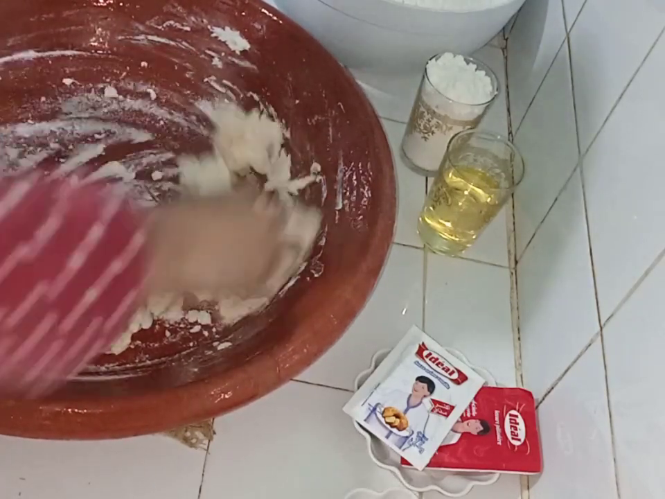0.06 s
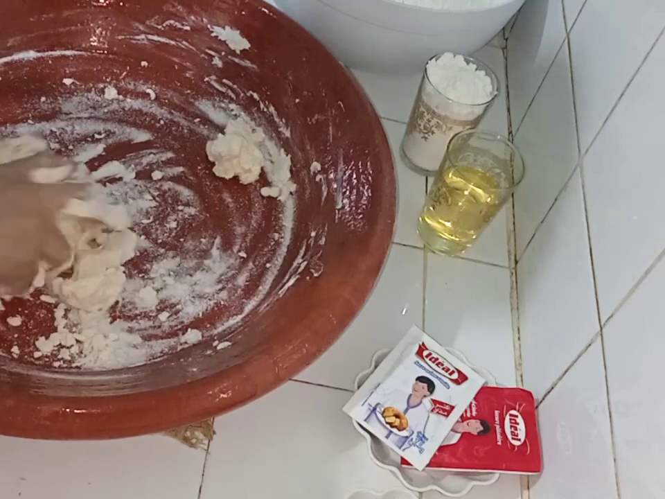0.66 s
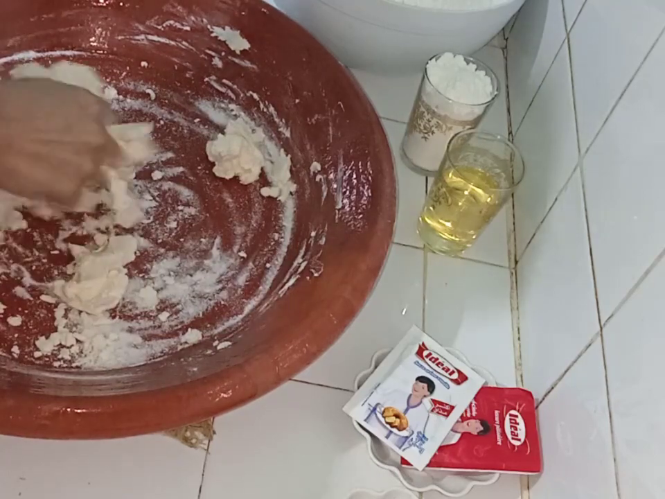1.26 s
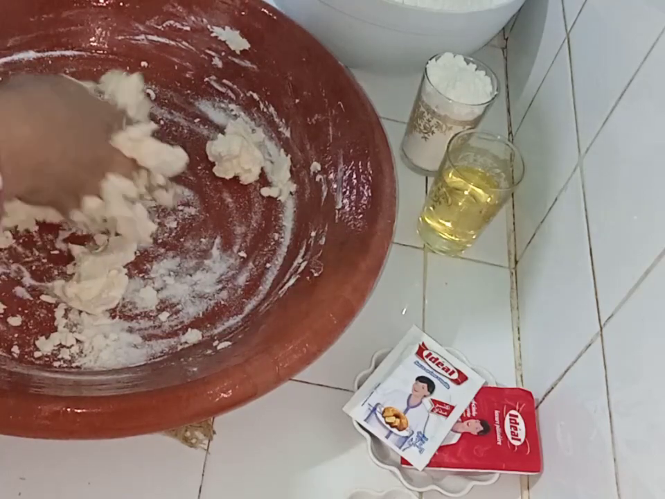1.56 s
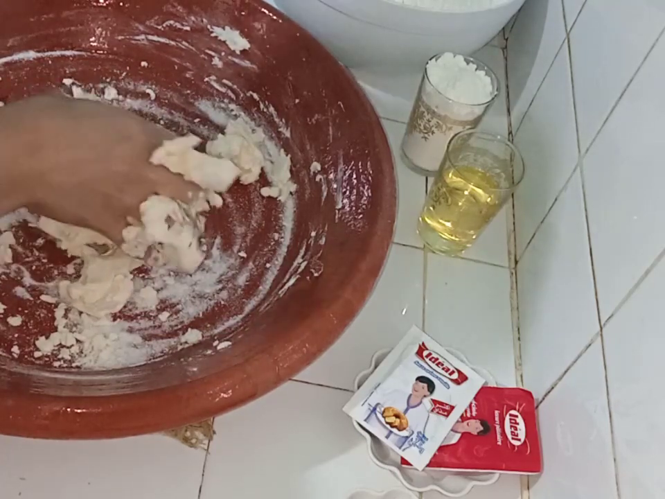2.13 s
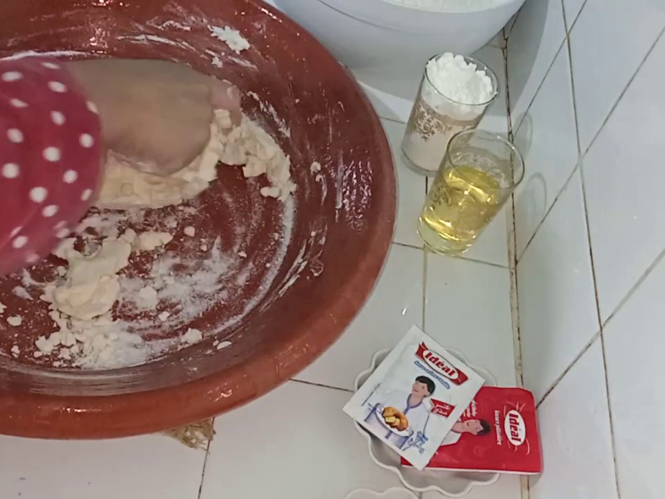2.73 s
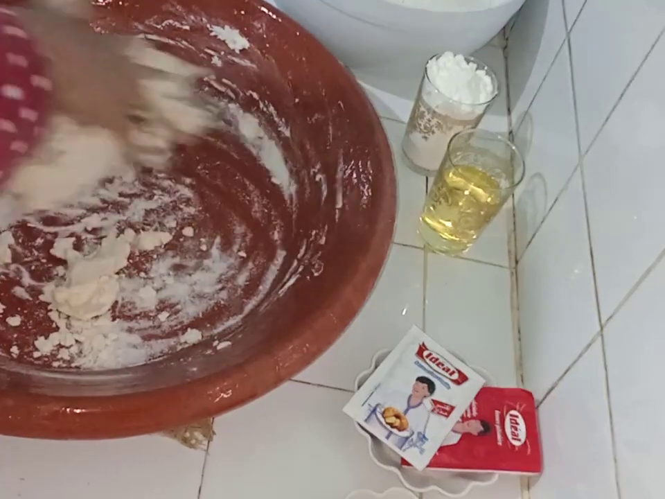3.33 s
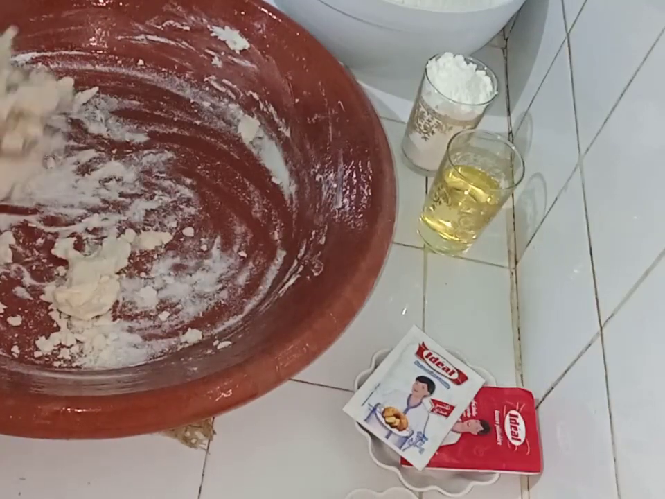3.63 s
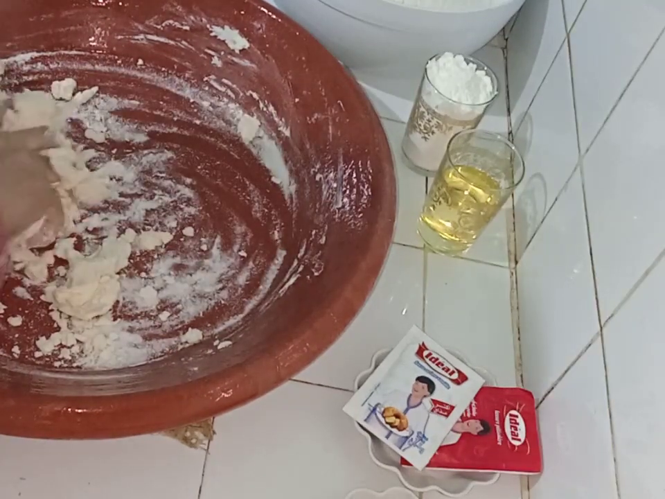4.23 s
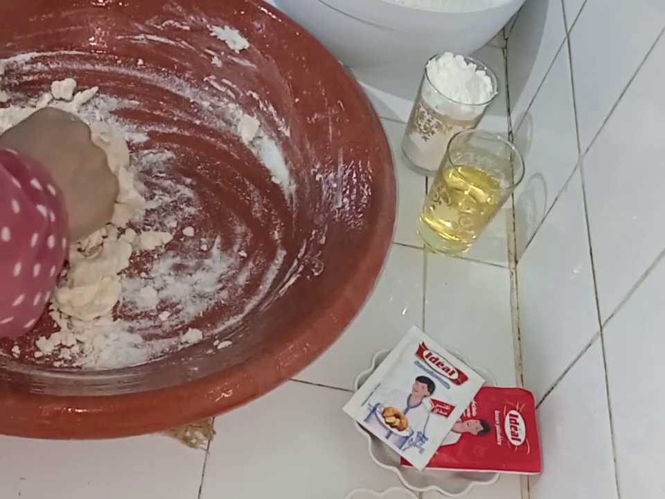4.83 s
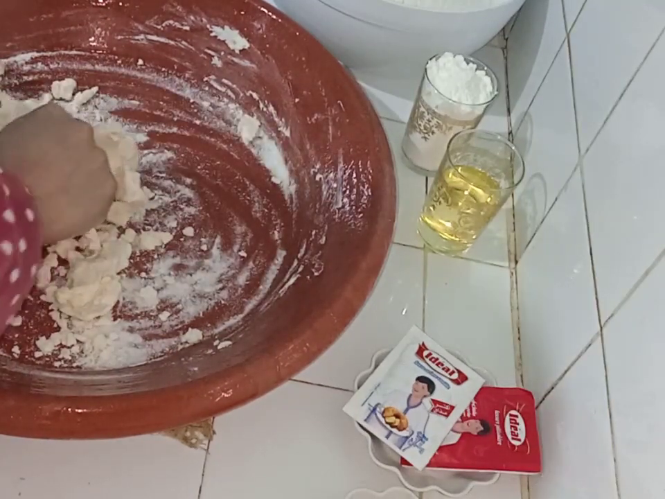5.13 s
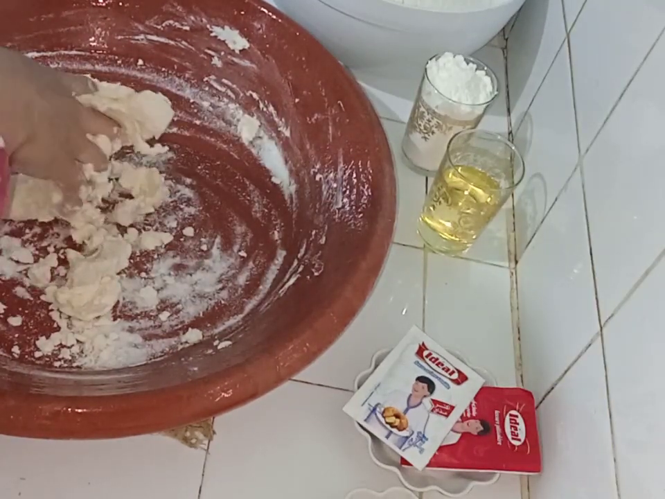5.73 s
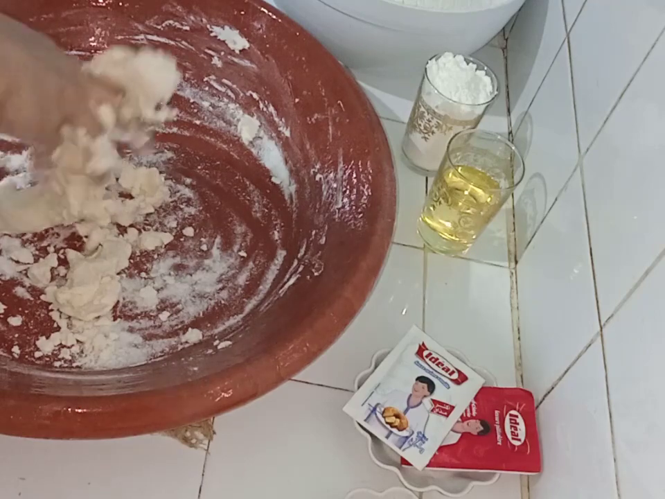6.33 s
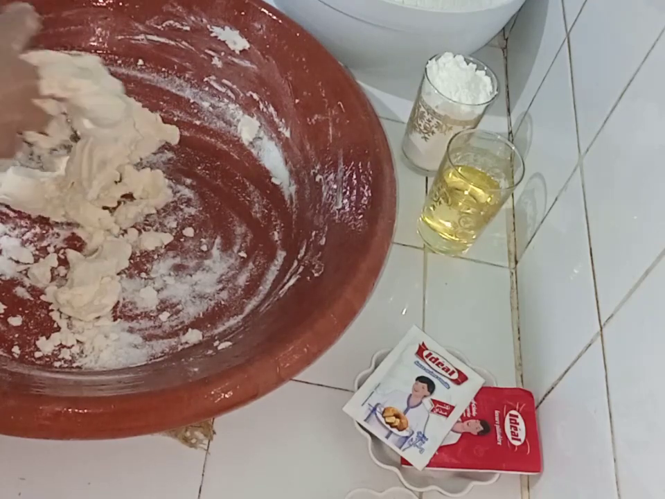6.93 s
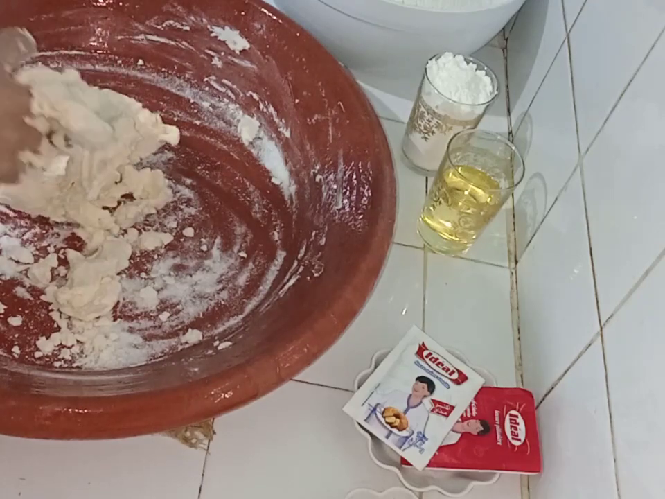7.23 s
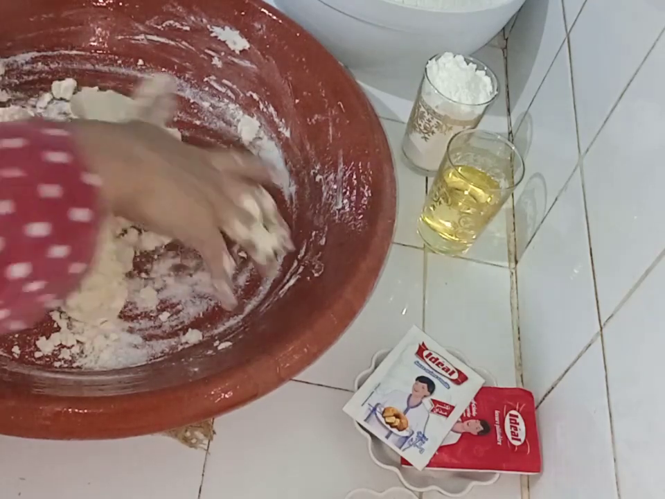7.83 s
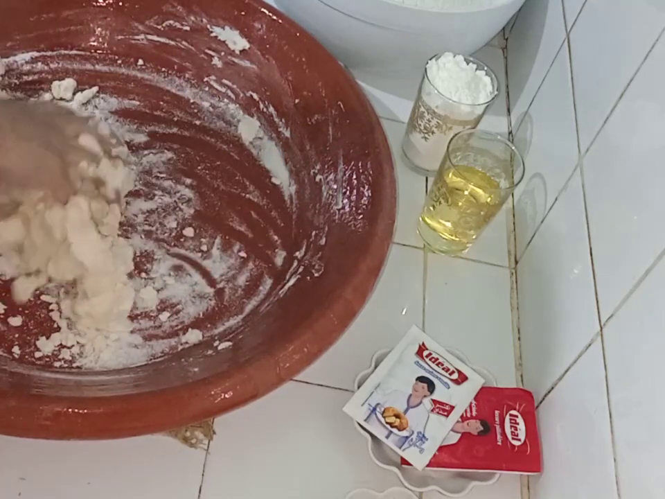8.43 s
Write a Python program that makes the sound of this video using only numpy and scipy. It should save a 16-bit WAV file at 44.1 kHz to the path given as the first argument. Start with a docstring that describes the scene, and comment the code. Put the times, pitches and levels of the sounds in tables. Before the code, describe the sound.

In a small tiled room, a parrot near the microphone repeats scratchy, high, hissing squawks. A quick opening run stops briefly, two more runs follow almost back to back, and a single squawk ends the scolding. Each note rings briefly off the tiles. Underneath are the very faint, sticky smearing of a hand working dough in a clay bowl and a low room hum.

```python
"""Runs of harsh, dry rasps, most likely a pet parrot scolding nearby in a small tiled room.
Each rasp is a source and a filter: a ragged train of pulses excites a throat whose resonances
slide up as the beak opens. Reflections off the tiles add a short, bright ring.
Far below, a hand kneads soft butter in a clay bowl, among faint hollow tones and a quiet room rumble."""
import sys
import numpy as np
from scipy import signal
from scipy.fft import rfft, irfft
from scipy.io import wavfile
from scipy.ndimage import uniform_filter1d

SR = 44100
rng = np.random.default_rng(int(sys.argv[2]) if len(sys.argv) > 2 else 0)


def persist_wave(psi):
    """Save psi, clipped to +-1, as 16-bit WAV."""
    counts = np.round(np.clip(psi, -1, 1) * 32767).astype(np.int16)
    wavfile.write(sys.argv[1], SR, np.atleast_2d(counts).T)


N = 373527
LEAD = SR // 4  # samples before time zero, so that the room already rings at the start

# spectrum of the quiet room: (frequency [Hz], level [dB])
ROOM_SPECTRUM = [(20, -37.5), (45, -17.5), (80, -9), (130, 3), (190, -3.5), (320, 4.5), (500, -4.5),
                 (800, -0.5), (1500, -10.5), (2700, -7), (4300, -22.5), (9000, -33.5), (16000, -36.5)]


def amp(db):
    """Decibels to amplitude ratio."""
    return 10 ** (np.asarray(db) / 20)


def unit(x):
    """Normalisation to rms 1."""
    return x / np.sqrt(np.mean(x ** 2) + 1e-20)


def read(points, hz):
    """Interpolation of a table on a log-frequency axis."""
    f, value = np.transpose(points)
    return np.interp(np.log(hz + 1), np.log(f + 1), value)


def colour(x, spectrum):
    """Spectral shaping: x filtered by a table of levels, at rms 1."""
    gain = amp(read(spectrum, np.fft.rfftfreq(len(x), 1 / SR)))
    return unit(irfft(rfft(x) * gain, len(x)))


def add(mix, start_s, sound):
    """Superposition of a sound on a track that begins LEAD samples early."""
    part = mix[max(LEAD + round(start_s * SR), 0):][:len(sound)]
    part += sound[:len(part)]


def wander(n, hz):
    """Random modulation of rms 1 that changes about hz times a second."""
    at = np.arange(n) * hz / SR
    return unit(np.interp(at, np.arange(n), rng.standard_normal(n)))


def patches(shape, bins, frames):
    """Random field of rms 1, correlated over bins in frequency and frames in time."""
    field = rng.standard_normal(shape)
    return unit(uniform_filter1d(uniform_filter1d(field, bins, 0), frames, 1))


def bell(hz, centre_hz, octaves):
    """Resonance curve: 1 at its centre, one half at the given octaves to either side."""
    return 1 / (1 + (np.log2((hz + 1) / centre_hz) / octaves) ** 2)


def room_air(air_db=-66.5, hum_hz=92.5, hum_db=-72.5, peak_s=4.2, fade_db_per_s=4):
    """Ambient noise, and a drone under random frequency and amplitude modulation that swells once."""
    air = colour(rng.standard_normal(N), ROOM_SPECTRUM) * amp(air_db)
    pitch_hz = hum_hz + 9 * wander(N, 30)
    hum = unit(np.sin(2 * np.pi * np.cumsum(pitch_hz) / SR))
    swell_db = hum_db - fade_db_per_s * abs(np.arange(N) / SR - peak_s)
    return air + hum * amp(swell_db + 3 * wander(N, 23))


def rumble(calls, level_db=-68, window_s=.35):
    """Envelope following: low noise swells with each run of rasps and drops out in the pauses."""
    envelope = np.sqrt(abs(uniform_filter1d(calls ** 2, int(window_s * SR))))
    return amp(level_db) * unit(envelope) * colour(rng.standard_normal(N), ROOM_SPECTRUM)


def kneading(ticks_per_s=250, tick_size=5, steady_db=-67.5, lumpy_db=2):
    """Friction noise: butter smears over clay in a lumpy hiss with sticky ticks; the level swells softly."""
    # spectrum of the smearing butter: (frequency [Hz], level [dB])
    smear_spectrum = [(150, -9), (330, -5), (550, -0.5), (900, 3), (1800, -3), (2900, -14), (4000, -23),
                      (8000, -33.5), (16000, -42)]
    # soft swells of low rustling noise, mostly under the runs of rasps:
    # (middle [s], length [s], level [dB])
    swells = [(.42, 0.19, -60), (1.202, .6, -64.5), (2.796, 0.42, -68.5), (4, 1.1, -65), (5.6, 0.51, -65),
              (6.55, 1.64, -61), (8.156, 0.41, -59)]
    ticks = (rng.random(N) < ticks_per_s / SR) * rng.standard_normal(N)
    smear = colour(rng.standard_normal(N) + tick_size * ticks, smear_spectrum)
    t = np.arange(N) / SR
    swelling = sum(amp(db) * np.exp(-(2 * (t - middle) / length) ** 2) for middle, length, db in swells)
    return smear * (amp(steady_db) + swelling) * amp(lumpy_db * wander(N, 25))


def hollow_tone(length, db, hz, width_hz):
    """Narrow resonance: random frequency modulation widens a softly swelling sine into a band."""
    n = int(length * SR)
    phase = 2 * np.pi * np.cumsum(hz + width_hz * wander(n, hz / 2)) / SR
    return amp(db) * unit(np.sin(phase) * np.hanning(n))


def tiled_room(x, direct_db=-6, early_db=-6.5, early_s=.009, bounces=7, tail_db=-4, modes_db=3):
    """Reverberation: direct sound, early reflections off near tiles, a diffuse tail and ringing modes."""
    # modes of the tiled corner: (frequency [Hz], level [dB])
    modes = [(1471, -4.5), (1602, -10.5), (1768, 3.5), (1890, -6.5), (2075, 2), (2266, 5), (2437, -14.5),
             (2767, -4.5), (2876, -9), (2966, -2.5), (3175, -4.5), (3795, 5), (4966, 1), (5993, 5)]
    # reverberation time of the room: (frequency [Hz], T60 [s])
    t60 = [(400, 0.41), (1500, 0.29), (3000, 0.26), (6000, 0.24), (9000, 0.26), (12000, 0.2), (16000, 0.17)]
    n = SR // 2
    t = np.arange(n) / SR
    echoes = rng.choice([-1., 1.], n) * (rng.random(n) < 3000 / SR) * (t > early_s / 2)
    hz, frame_s, spectra = signal.stft(echoes, SR, nperseg=256)
    fade_db = -60 * frame_s / read(t60, hz)[:, None]
    tail = signal.istft(spectra * amp(fade_db), SR)[1][:n]
    # the modes ring 0.44 times as long as the tail
    ring = sum(amp(db - 60 * t / (0.44 * read(t60, f))) * np.cos(2 * np.pi * f * t) for f, db in modes)
    response = amp(tail_db) * tail / np.linalg.norm(tail)
    response += amp(modes_db) * ring / abs(rfft(ring)).max()
    delays = (rng.uniform(.2, 1, bounces) * early_s * SR).astype(int)
    response[delays] += amp(early_db) * rng.choice([-1., 1.], bounces) / np.sqrt(bounces)
    response[0] += amp(direct_db)
    return signal.fftconvolve(x, response)


def ragged_pulses(n, pulse_hz=190, jitter=.36, puff_s=0.0018, leak=0.34, shimmer_db=0.7, snap=2.8):
    """Aperiodic source: membranes slap at uneven intervals, each slap a snap and a short puff of air."""
    turns = np.cumsum(pulse_hz * np.exp(jitter * wander(n, pulse_hz))) / SR
    cycle = turns.astype(int)
    size = amp(shimmer_db * rng.standard_normal(n))[cycle]
    puffs = (leak + np.exp(-(turns % 1) / (pulse_hz * puff_s))) * rng.choice([-1., 1.], n)
    snaps = np.diff(cycle, prepend=0)
    return size * (puffs + snap * snaps)


def beak(t, attack, low_hz, high_hz, tilt, shut_octaves=.85, shut_low_hz=1790):
    """Formant glide as the beak opens: gives closure [octaves] and the low and high resonance [Hz]."""
    usual_attack_s, usual_high_hz = 0.029, 6340
    # slow, dull rasps start more shut; wide or slow openings take longer
    glide = np.clip(0.76 + 17 * (attack - usual_attack_s) - 0.14 * tilt, 0, shut_octaves)
    opening_s = 0.022 * (high_hz / usual_high_hz) ** 6.3 * (attack / usual_attack_s) ** .6
    closure = glide * np.exp(-(t / opening_s) ** 2)
    low = low_hz * (shut_low_hz / low_hz) ** (closure / shut_octaves)
    return closure, low, high_hz / 2 ** closure


def throat(hz, t, db, attack, low_hz, high_hz, tilt, usual_db=-18.5, usual_low_hz=2600):
    """Formant filter: gain [dB] over frequency and time; the treble comes out as the beak opens."""
    # colour that all rasps share: (frequency [Hz], level [dB])
    voice_spectrum = [(350, -66.5), (680, -42.5), (830, -22), (1100, -22), (1400, -10), (1750, -3),
                      (2300, -3.5), (3000, -3.5), (3500, -5), (3900, 3), (4400, -10), (5100, -4),
                      (6300, -7), (8000, -12.5), (10000, -28), (12000, -29), (16000, -25.5)]
    closure, low, high = beak(t, attack, low_hz, high_hz, tilt)
    # a brighter rasp is more pinched: more low resonance, less middle and hiss
    low_db = 8 + 1.3 * tilt + 6.5 * np.log2(low_hz / usual_low_hz)
    middle_db = -6 - 1.9 * tilt
    hiss_db = 0.35 - 1.3 * tilt
    high_db = 8 + 1.15 * (db - usual_db)  # grows with loudness
    # like a pipe, the throat repeats its high resonance further up, more weakly
    high_series = sum(share * bell(hz, ratio * high, octaves=0.078)
                      for ratio, share in [(1, 1), (1.5, 0.42), (2, 0.42)])
    hiss_band = bell(hz, 13500, octaves=0.63)
    slope_db = (tilt - 3 * closure) * np.log2(np.maximum(hz / 3000, .2))
    gain_db = (read(voice_spectrum, hz) + slope_db
               + low_db * bell(hz, low, octaves=0.12)
               + middle_db * bell(hz, 3967, octaves=0.12)
               + high_db * high_series
               + hiss_db * hiss_band)
    squeals_db = 2.3 * patches(gain_db.shape, bins=2, frames=24)
    sputter_db = 3.5 * hiss_band * patches(gain_db.shape, bins=70, frames=6)
    return gain_db + squeals_db + sputter_db


def rasp(length, db, attack, low_hz, high_hz, tilt, release_s=0.029):
    """Source and filter: ragged pulses pass through the throat and make one scolding note."""
    n = int(length * SR)
    hz, frame_s, spectra = signal.stft(ragged_pulses(n), SR, nperseg=256, noverlap=192)
    throat_db = throat(hz[:, None], frame_s, db, attack, low_hz, high_hz, tilt)
    voice = signal.istft(spectra * amp(throat_db), SR, nperseg=256, noverlap=192)[1][:n]
    t = np.arange(n) / SR
    rise = np.minimum(0.12 + t / attack, 1)
    fall = np.minimum((length - t) / release_s, 1)
    return amp(db) * unit(voice) * rise * fall


def scene():
    """Superposition of all sources in mono; the bird moves between notes, so each meets other echoes."""
    # scolding notes: (start [s], length [s], level [dB], attack [s],
    # low resonance [Hz], high resonance [Hz], brightness tilt [dB/octave])
    rasps = [(-0.11, 0.11, -19.5, 0.03, 1950, 7030, 0.5), (0.168, 0.096, -19.5, 0.02, 2300, 7100, 0),
             (0.357, 0.12, -17.5, 0.023, 2290, 6500, 0.15), (0.586, 0.099, -14.5, 0.052, 2857, 6200, 1),
             (0.785, 0.098, -17.5, 0.028, 3120, 6270, 2), (0.916, 0.1, -17, 0.05, 3146, 6120, 0.5),
             (1.09, 0.098, -19, 0.016, 3300, 6850, 4), (1.242, 0.11, -17.5, 0.014, 3120, 6540, 1),
             (1.386, 0.11, -17.5, 0.012, 2930, 6030, 4.5), (1.53, 0.12, -22, 0.0089, 3120, 5420, 0),
             (1.703, 0.122, -21.5, 0.023, 3020, 5800, 1.2), (2.425, 0.11, -19, 0.027, 2165, 6350, -1),
             (2.611, 0.12, -19.5, 0.018, 2340, 6100, -2.6), (2.807, 0.128, -18.5, 0.03, 2930, 5750, -0.5),
             (3.192, 0.098, -20, 0.017, 2130, 7060, 1), (3.395, 0.13, -19, 0.024, 2200, 6130, -1),
             (3.599, 0.13, -19, 0.035, 2243, 5350, -1), (3.801, 0.12, -20, 0.018, 2150, 5230, -2),
             (4.001, 0.141, -20, 0.021, 2230, 6030, -2.5), (4.223, 0.108, -19.5, 0.039, 2570, 5160, -2.5),
             (4.402, 0.14, -21, 0.019, 1917, 6030, -3), (4.637, 0.1, -19.5, 0.024, 2013, 4883, -1.3),
             (5.116, 0.07, -21.2, 0.024, 1810, 7440, 0), (5.308, 0.086, -19.5, 0.025, 1970, 6560, -1),
             (5.528, 0.088, -19, 0.031, 2750, 7040, 1), (5.852, 0.057, -18.5, 0.017, 1940, 5110, -1.1),
             (6.031, 0.082, -17, 0.059, 2940, 6000, 1.3), (6.226, 0.11, -16, 0.08, 2980, 5970, 0.4),
             (6.432, 0.13, -19, 0.008, 3070, 7150, 1), (6.625, 0.13, -22, 0.014, 3020, 6470, 0.3),
             (6.811, 0.13, -21.5, 0.025, 2890, 6180, 2), (6.996, 0.142, -22.5, 0.022, 2870, 5750, 1.5),
             (7.199, 0.13, -22, 0.016, 3038, 5760, 0.5), (7.91, 0.12, -20, 0.047, 2268, 5994, -0.6)]
    # faint hollow tones: (start [s], length [s], level [dB], pitch [Hz], width [Hz])
    tones = [(0.747, 0.025, -46, 885, 110), (2.027, 0.14, -69, 793, 35), (7.378, 0.048, -56.5, 814, 44),
             (7.993, 0.029, -47, 793, 54), (7.998, 0.23, -71.5, 204.3, 11), (8.21, 0.21, -50, 837, 22)]
    notes = [(start, rasp(*note)) for start, *note in rasps]
    notes += [(start, hollow_tone(*note)) for start, *note in tones]
    calls = np.zeros(LEAD + N)
    for start, sound in notes:
        add(calls, start, tiled_room(sound))
    calls = calls[LEAD:]
    mono = calls + kneading() + room_air() + rumble(calls)
    return np.array([mono, mono])


def record(dry):
    """Band limiting: a steep low-pass at 16.2 kHz."""
    low_pass = signal.firwin(511, 16200, window=("kaiser", 9), fs=SR)
    return signal.oaconvolve(dry, low_pass[None], "same")


dry = scene()
out = record(dry)
persist_wave(out)
```